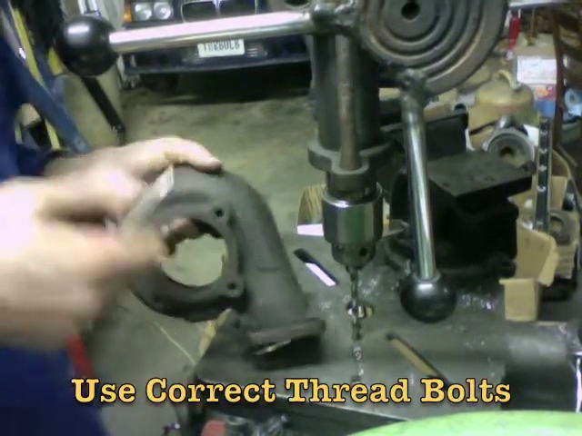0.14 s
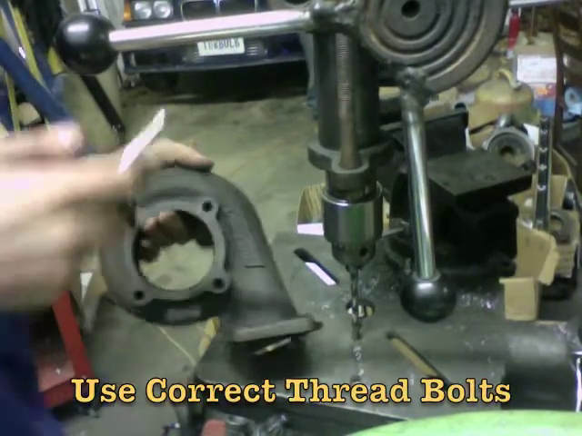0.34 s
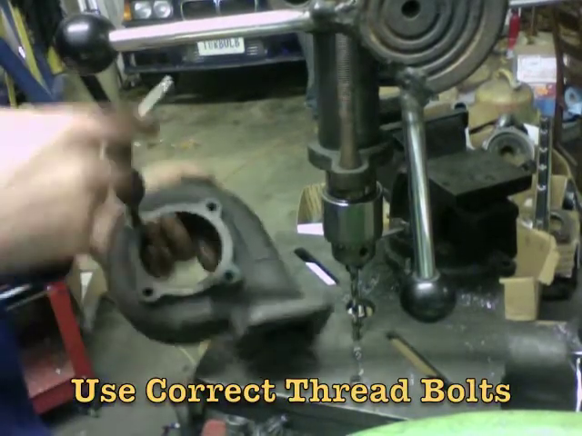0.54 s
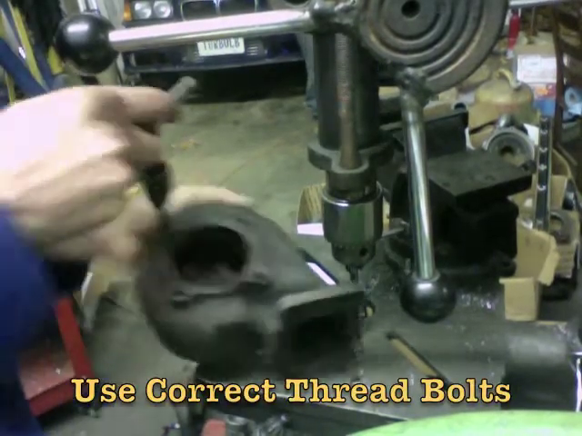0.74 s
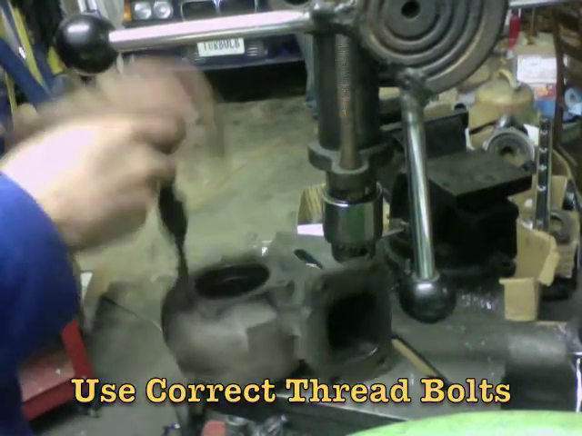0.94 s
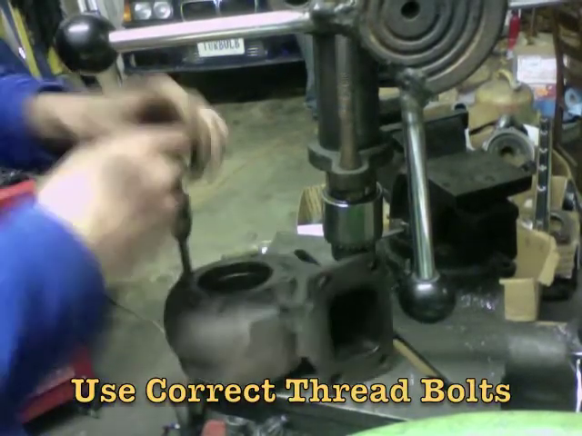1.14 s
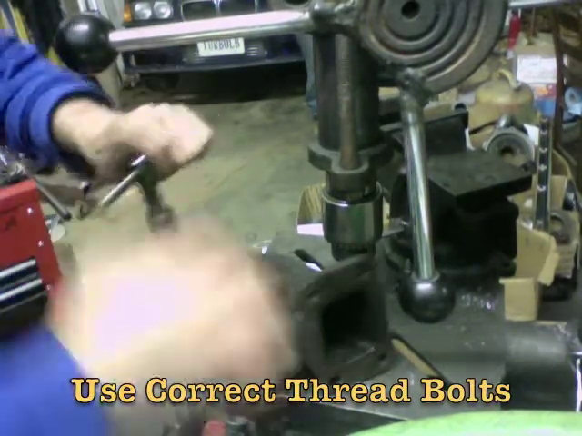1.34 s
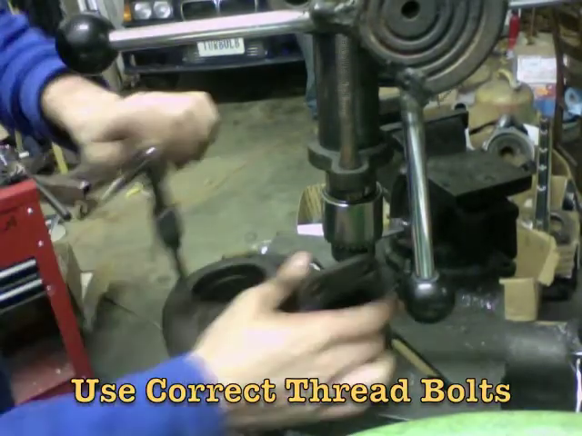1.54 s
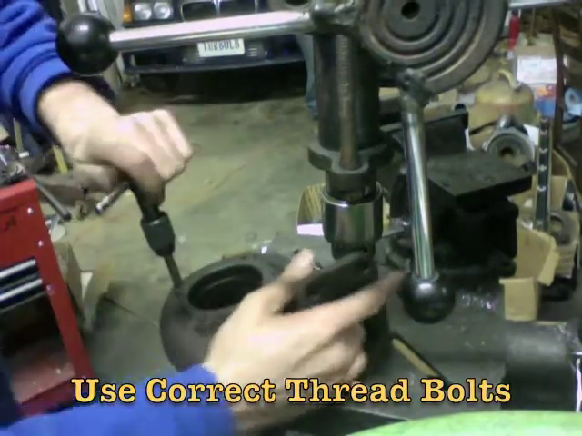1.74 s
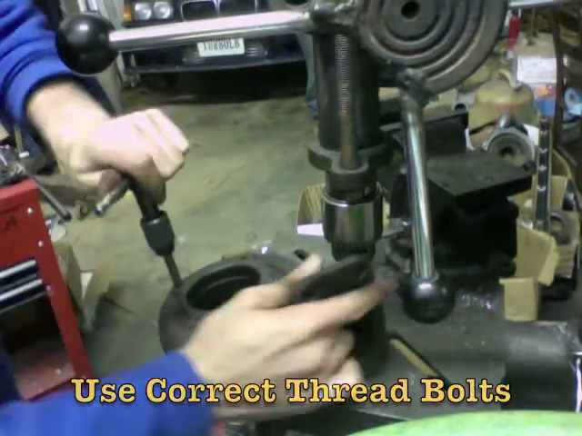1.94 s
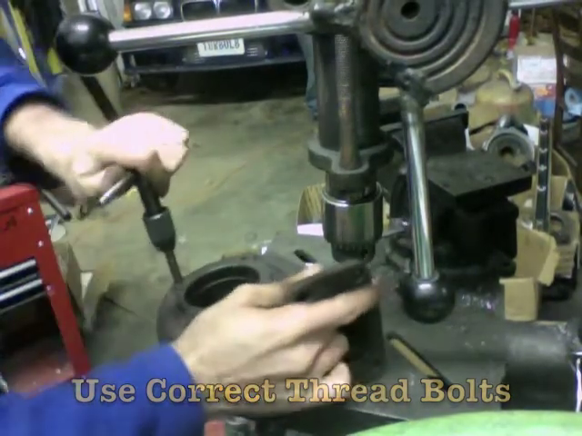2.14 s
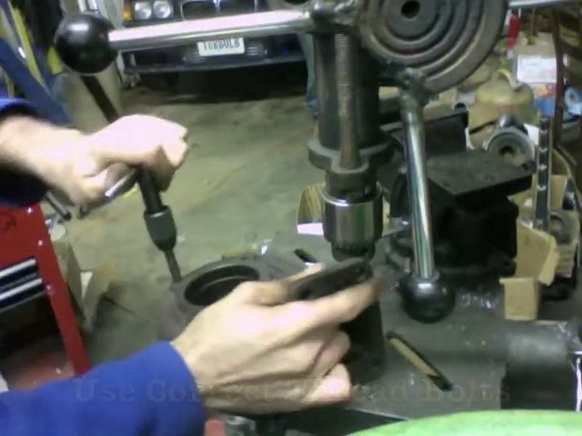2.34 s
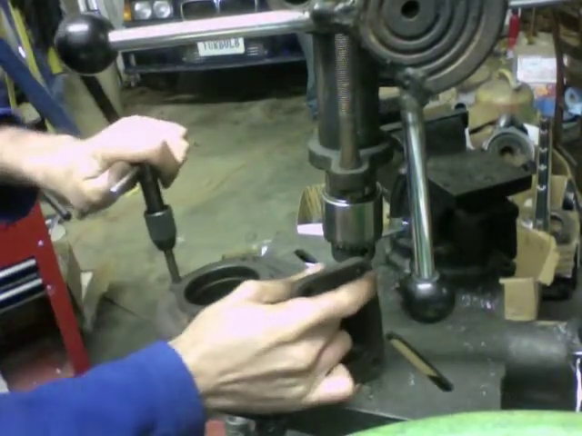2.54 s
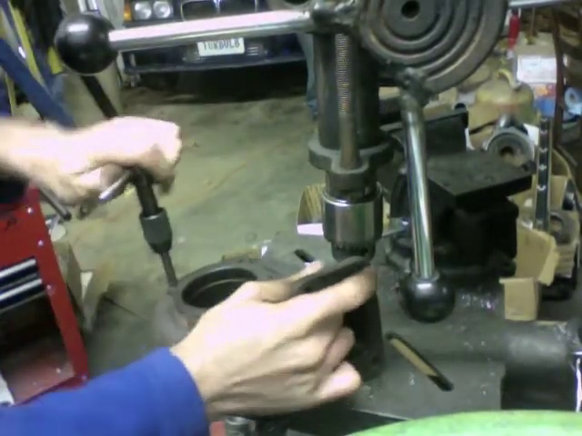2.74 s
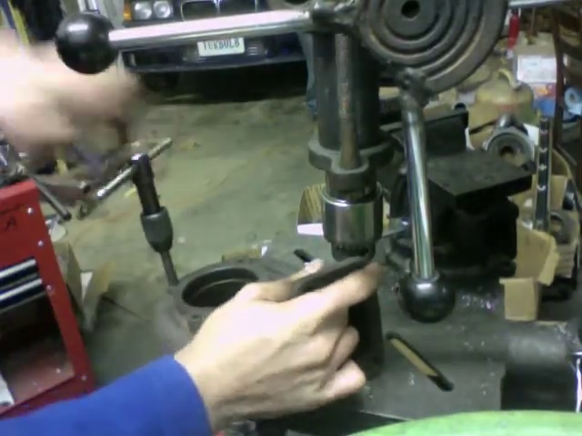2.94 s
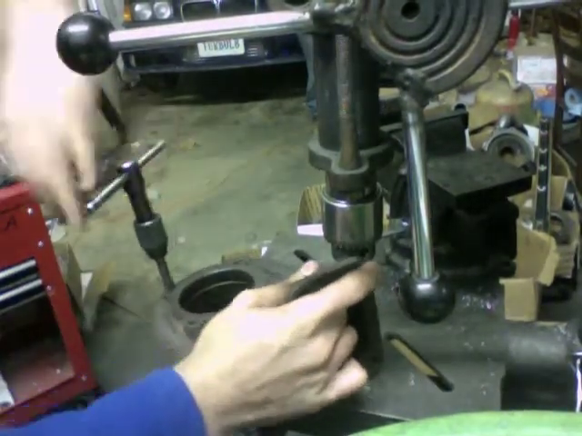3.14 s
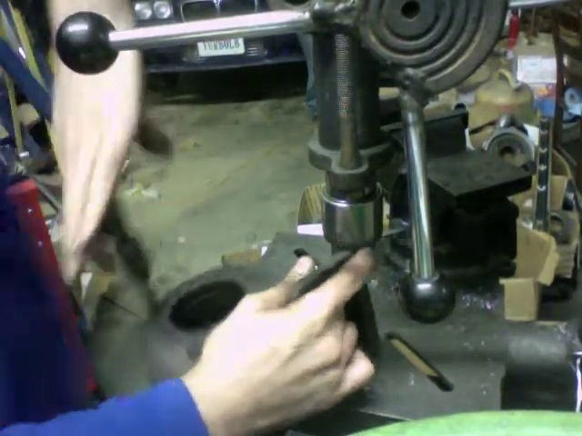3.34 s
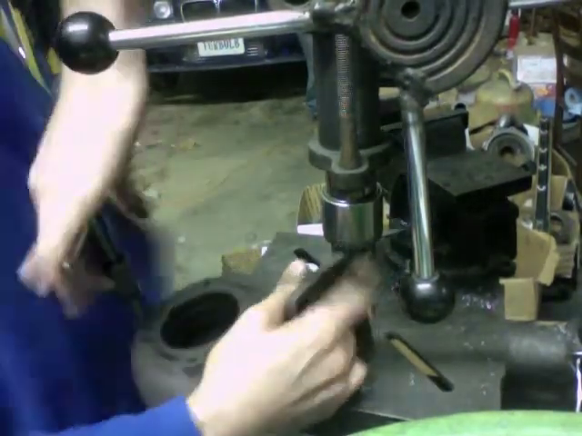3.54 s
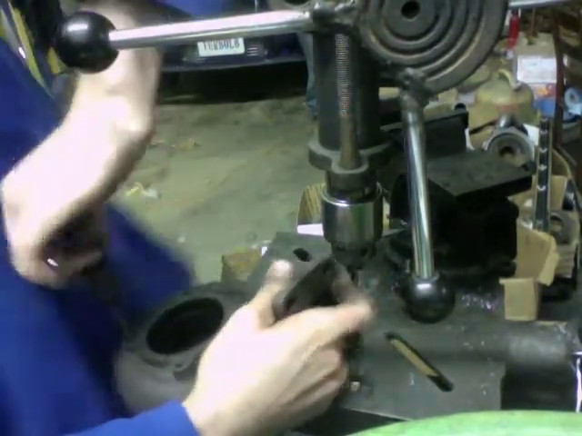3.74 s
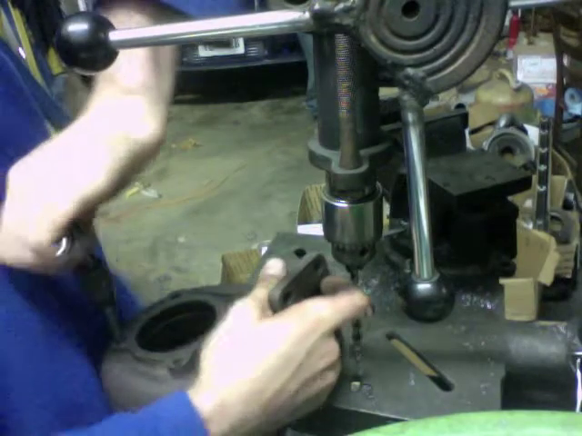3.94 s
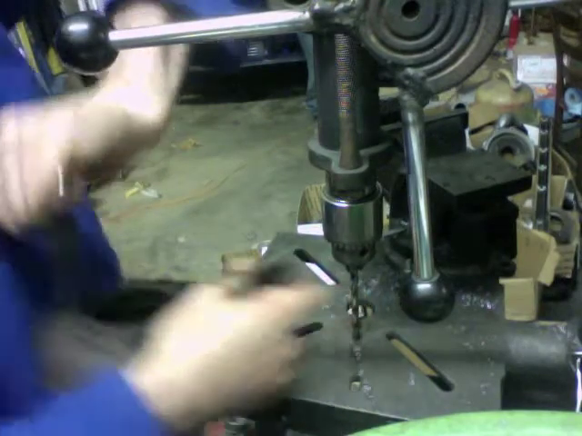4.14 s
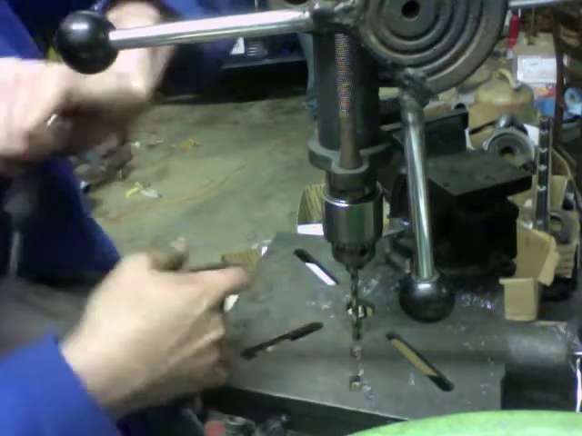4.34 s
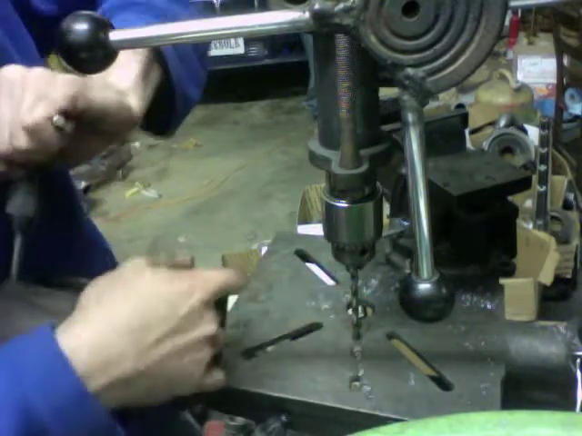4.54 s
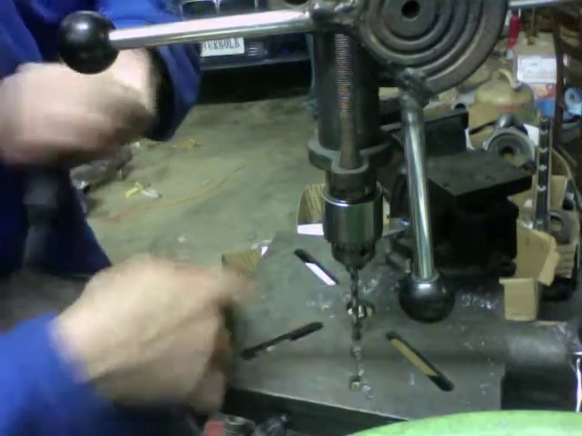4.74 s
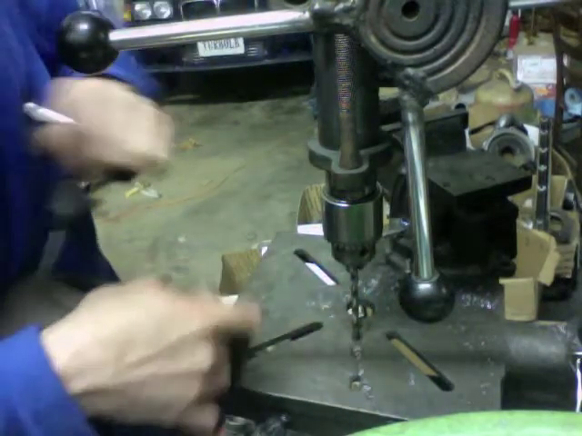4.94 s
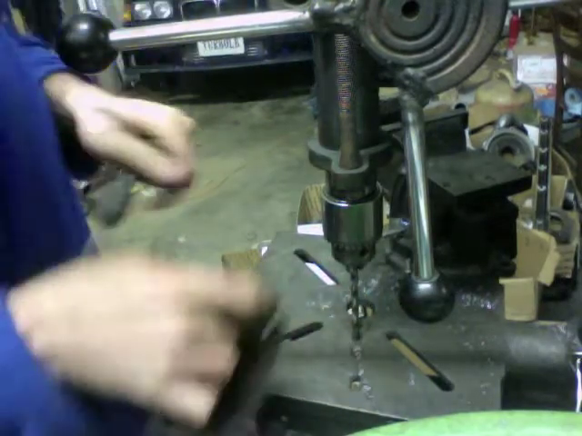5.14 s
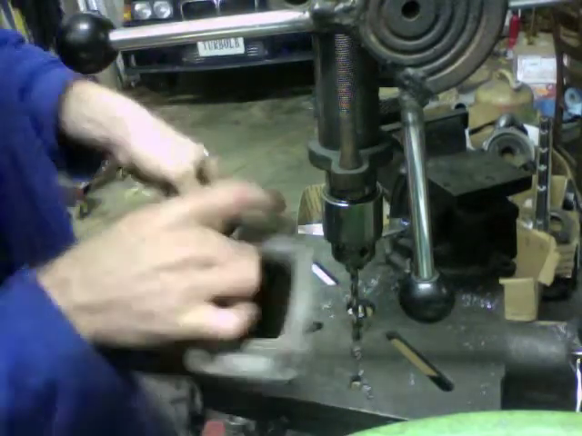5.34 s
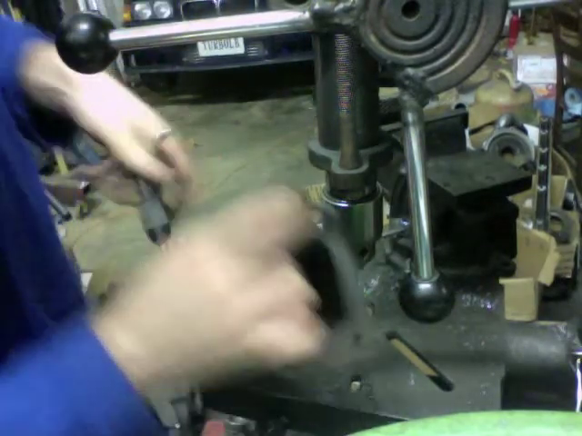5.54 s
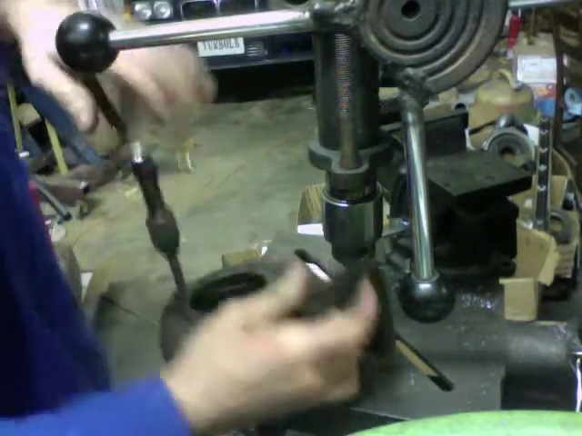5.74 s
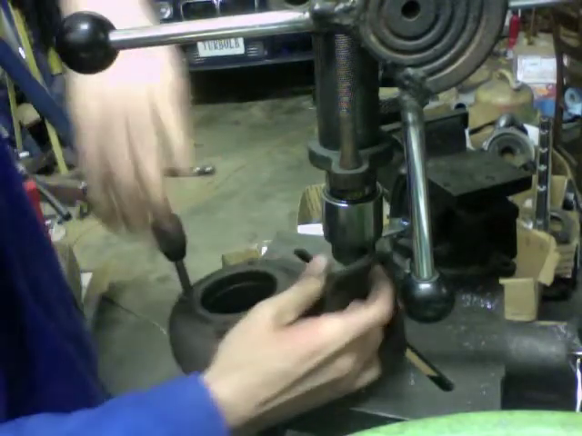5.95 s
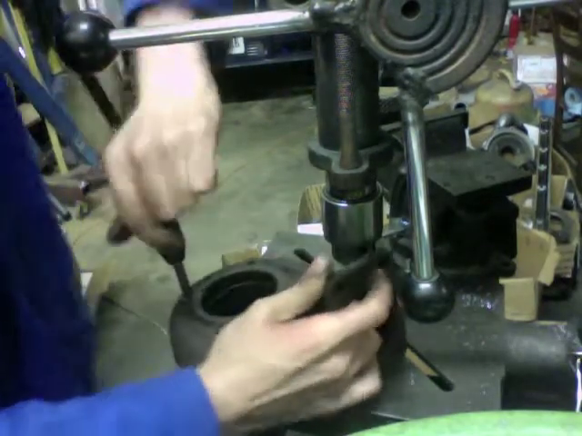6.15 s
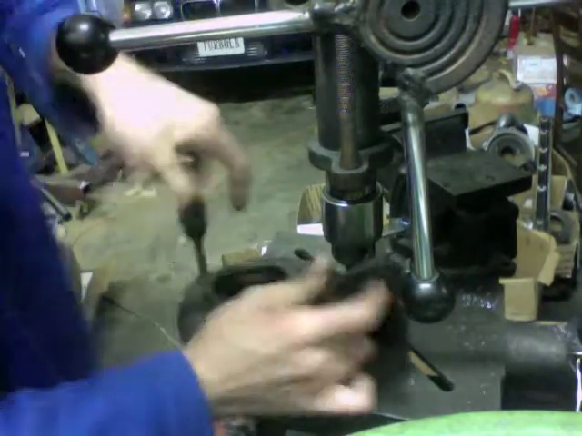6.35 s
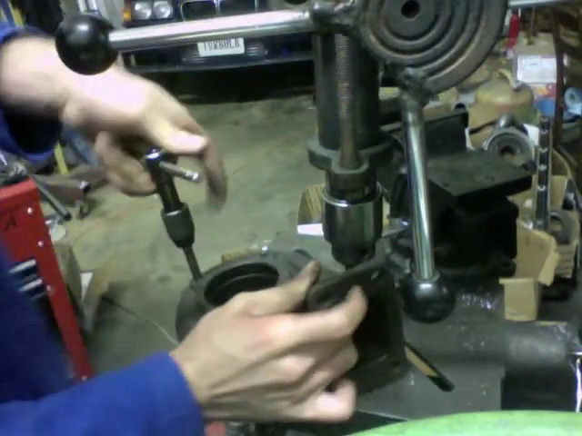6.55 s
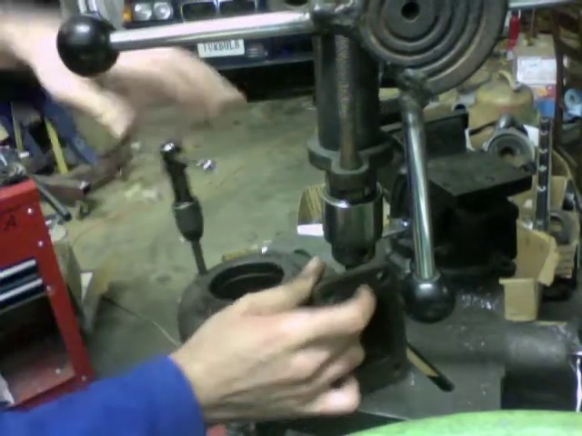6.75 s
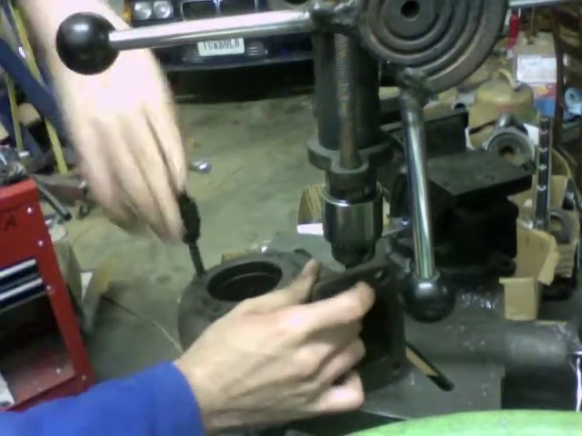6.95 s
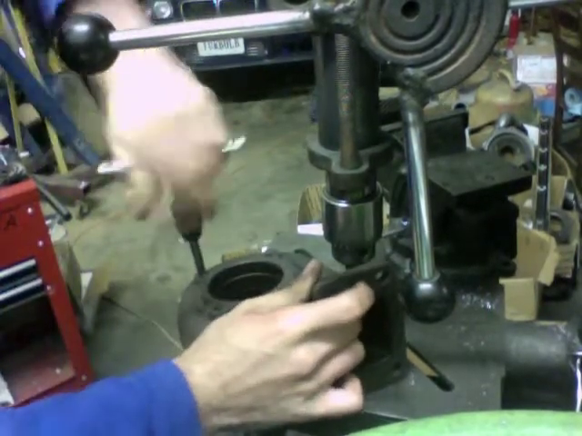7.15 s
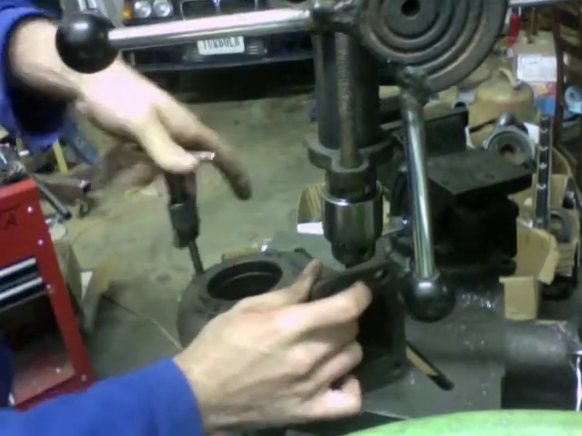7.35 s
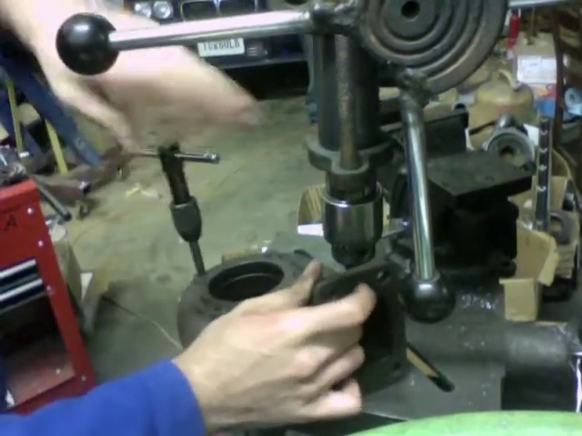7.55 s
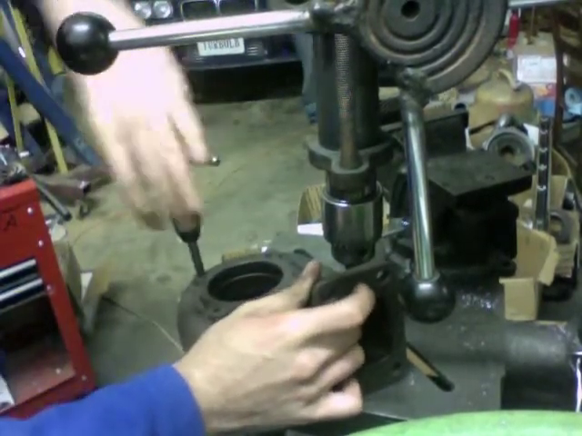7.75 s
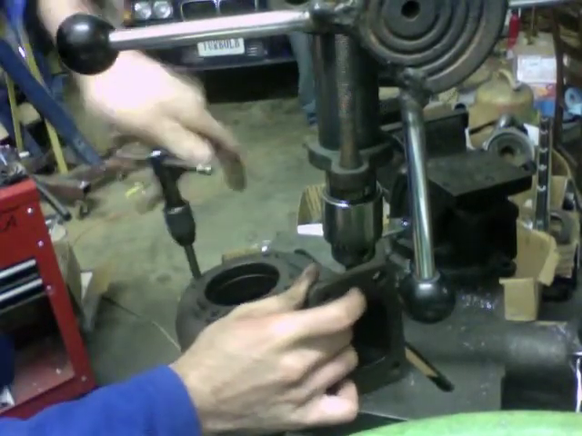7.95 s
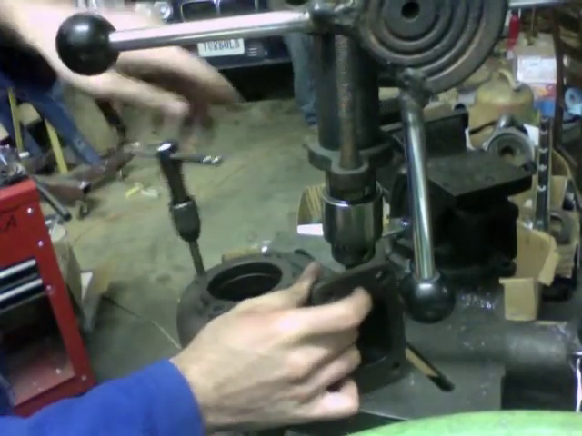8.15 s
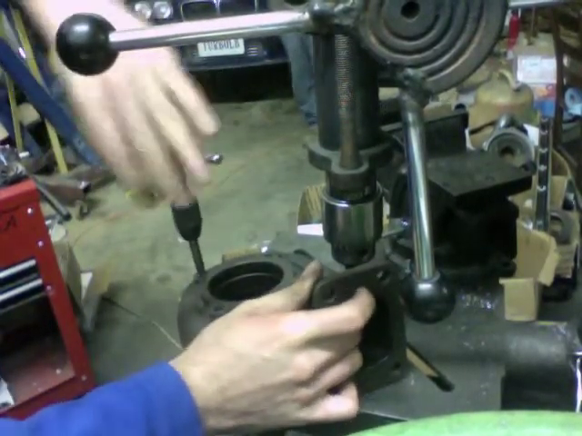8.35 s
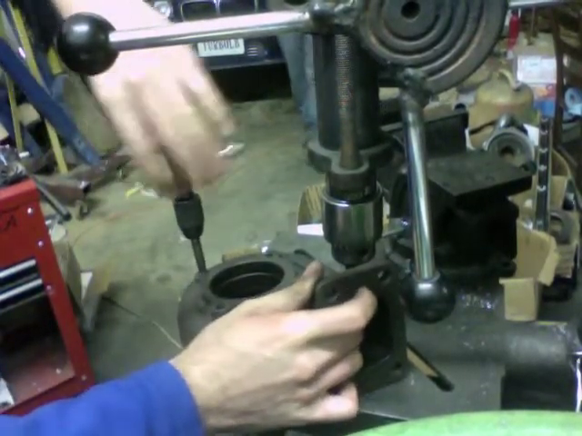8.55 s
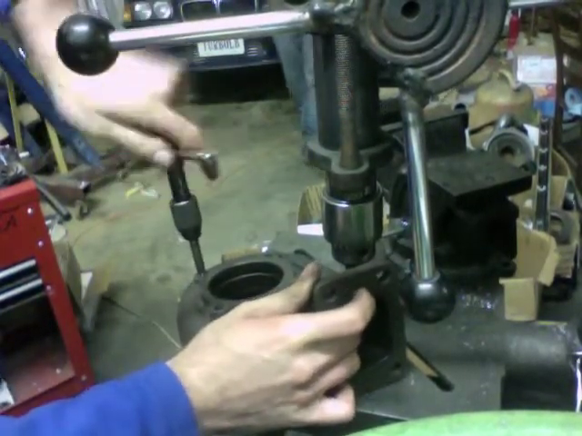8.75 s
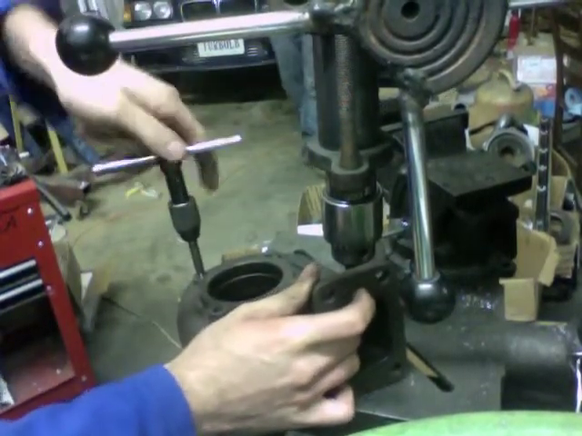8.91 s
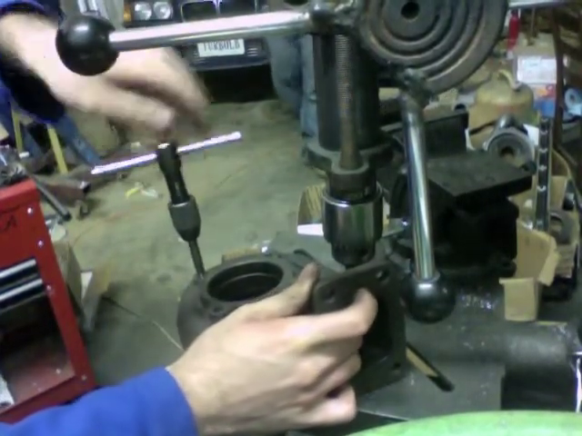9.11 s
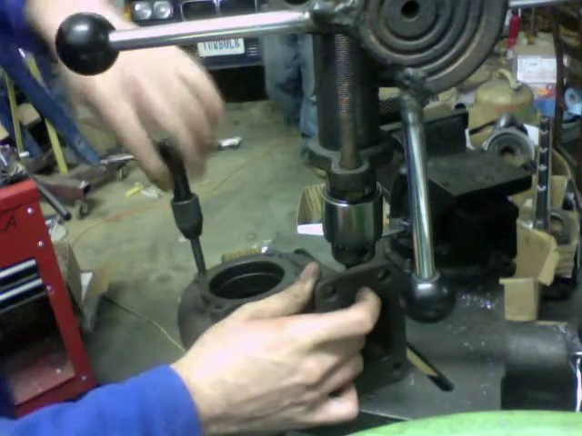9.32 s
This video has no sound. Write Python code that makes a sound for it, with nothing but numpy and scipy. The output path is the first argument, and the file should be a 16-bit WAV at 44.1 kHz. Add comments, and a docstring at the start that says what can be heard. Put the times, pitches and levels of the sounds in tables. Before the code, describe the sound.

A close, thin small-microphone perspective in a workshop, with faint steady hiss and short reverberation. From 0 to 0.9 s a heavy iron housing grinds over a steel table in uneven shoves, ringing and singing at high pitches; sharp knocks fall at 0.3 and, loudest, around 0.9, slightly overloaded. At 1.1-1.6 a tap thuds dully in its hole, followed by faint crunches, thin chirps and sleeve rustle until 2.6. Bright clinks come at 2.8, 3.15 and 3.4, with scraping from 3.1 to 4.2. Two ragged, piercing iron squeals sound at 4.65 and 4.85, the second longer and fading. Hard bangs strike at 5.7 and 6.35, with short deep scrapes and a cloth swish between. After 6.6 only light, bright clinks and ticks of the spun wrench's loose bar remain, irregular, strongest near 7.4, 8.57 and 9.1, with a tiny chirp at 7.1.

```python
"""A cast-iron housing is dragged, turned and set down on the steel table of a drill press in a workshop.
Random catches, moving resonances and ringing modes make it grind and sing; short rattles with dense tails
make it knock, and ragged harmonics make it squeal twice. A tap in its hole thuds, crunches and chirps, the
loose cross bar of its wrench clinks, and a sleeve swishes past as hiss with gliding zips. A faint hiss lies
below; the small microphone overloads on the loudest knocks."""
import sys
import numpy as np
from scipy import signal
from scipy.fft import rfft, irfft, next_fast_len
from scipy.io import wavfile
from scipy.ndimage import uniform_filter1d

SR = 44100
rng = np.random.default_rng(int(sys.argv[2]) if len(sys.argv) > 2 else 0)


def inscribe(sig):
    """Save sig as 16-bit PCM at rate SR to the path in sys.argv[1].

    A 1-D sig is mono; a 2-D sig holds one channel per row.
    Samples are clipped to [-1, 1] before scaling.
    """
    pcm = np.round(np.clip(np.atleast_2d(sig).T, -1, 1) * 32767)
    wavfile.write(sys.argv[1], SR, pcm.astype(np.int16))


N = 413658
TIME = np.arange(N) / SR

# bass, middle and treble: low_hz, high_hz
RANGES_HZ = [(40, 600), (600, 3700), (3700, 17000)]
# third-octave bands
EDGES_HZ = np.geomspace(50, 17000, 26)
CENTRES_HZ = np.sqrt(EDGES_HZ[1:] * EDGES_HZ[:-1])
# modes of the housing on the table: pitch_hz, level_db (relative), t60_s (ringing freely)
IRON_MODES = [(355, -2, .4), (564, -6, .3), (778, -3, .3), (990, -5, .3), (1315, 1, .35), (1528, -4, .3),
              (1866, -4, .4), (2150, 0, .35), (2256, -6, .3), (2430, -1, .45), (2550, -3, .3),
              (2848, 1, .33), (3172, -2, .35), (3495, 0, .35), (3805, -2, .35), (4305, -11, .3),
              (4863, -6, .35), (5425, -8, .3), (5850, -4, .3), (6245, -5, .35), (6545, -3, .35),
              (7180, -10, .3), (7430, -11, .25), (8210, -13, .25), (8370, -14, .25), (8620, -12, .2),
              (9650, -19, .2), (10520, -21, .2), (11250, -24, .15), (11610, -20, .2), (11900, -25, .2),
              (12180, -25, .15), (13420, -30, .2)]
# dying away of table and workshop together: frequency_hz, t60_s
DECAY = [(100, 0.95), (400, 0.45), (1200, 0.61), (3000, 0.56), (6500, 0.44), (10000, 0.4), (15000, 0.2)]


def sliding():
    """Rough iron catches on the steel about 2000 times a second and keeps the housing ringing."""
    # colour of the grinding: frequency_hz, level_db
    slide_colour = [(29, -85), (50, -37.5), (114, -14), (200, -9.5), (362, -5), (480, -14), (711, -14.5),
                    (1050, -14.5), (1330, -9), (1620, -17.5), (2810, -17), (3600, -25.5), (5150, -28.5),
                    (6710, -23.5), (7600, -27.5), (9000, -39), (12000, -41), (16000, -81)]
    # ringing over grinding: bass_db, middle_db, treble_db
    ring_over_grind_db = (-8, -3, 10)
    free_share = .07   # share of its free ring time that each mode keeps while dragged
    wander_db = 8.0

    judder = from_db(0.63 * drift(90))
    force = grit(grains_per_s=2000, grain_db=3.0) * judder
    springy = contact(bounce_width_hz=115, whine_width_hz=110)
    rough = coloured(force, slide_colour) + from_db(-2.0) * springy

    # as the point of contact travels, it favours now one mode, now another; the contact damps them all
    ringing = np.zeros(N)
    for hz, db, t60 in IRON_MODES:
        damped_t60 = free_share * t60
        mode = rms_one(ring(ring(force, hz, damped_t60), hz, damped_t60))
        ringing += from_db(db + wander_db * drift(14)) * mode

    out = np.zeros(N)
    for (low, high), ring_db, gain in zip(RANGES_HZ, ring_over_grind_db, shoves()):
        grinding_part = rms_one(band(rough, low, high, order=4))
        ringing_part = rms_one(band(ringing, low, high, order=4))
        part = grinding_part + from_db(ring_db) * ringing_part
        # even out the level, so that the shoves alone shape it
        running_power = uniform_filter1d(part ** 2, size=3000)
        out += gain * part / np.sqrt(running_power + 1e-9)
    return out


def shoves():
    """Gain of bass, middle and treble: each shove builds up, fades or grows as it goes, and rings out."""
    # shoves of the housing over the table:
    # start_s, length_s, attack_s, bass_db, middle_db, treble_db, fade_db (over the shove; negative grows)
    shove_rows = [(-0.02, 0.29, 0.029, -34, -39.5, -43.5, -1.5),
                  (0.233, 0.073, 0.036, -25.5, -21.5, -25, 10),
                  (0.358, 0.12, 0.078, -21.5, -25.5, -31.5, 5.5),
                  (0.498, 0.22, 0.018, -33.5, -34, -46, -6.5), (0.628, 0.24, 0.025, -24.5, -27, -46.5, 4),
                  (3.14, 0.09, 0.051, -28, -30.5, -44.5, 0), (3.238, 0.067, 0.019, -23.5, -28.5, -42, 3),
                  (3.29, 0.3, 0.023, -26, -35, -49.5, 10.5), (3.56, 0.13, 0.049, -25.5, -33.5, -47.5, 7),
                  (3.711, 0.068, 0.021, -45, -55.5, -70, 4), (3.86, 0.079, 0.021, -36, -44, -54, 1),
                  (3.902, 0.18, 0.1, -29, -27, -34, 0.5), (4.098, 0.084, 0.027, -32.5, -29, -38.5, -2.5),
                  (4.191, 0.027, .02, -36.5, -40, -45, -1), (5.868, 0.078, 0.037, -12, -20, -28, 21.5),
                  (6.18, 0.082, 0.059, -19, -20, -30.5, 4.5), (6.29, 0.11, 0.027, -30, -31.5, -44, -4),
                  (6.445, 0.16, 0.011, -32.5, -32, -42.5, 14)]
    rise_db, ring_out_db_per_s = 23, 185   # climb during the attack; fall once the housing stops

    gains = np.zeros((len(RANGES_HZ), N))
    for s, length, attack, *levels, fade_db in shove_rows:
        near = (TIME > s) & (TIME < s + length + .5)
        t = TIME[near] - s
        below_db = rise_db * np.maximum(1 - t / attack, 0)
        below_db += fade_db * np.minimum(t / length, 1)
        below_db += ring_out_db_per_s * np.maximum(t - length, 0)
        shove = from_db(np.array(levels)[:, None] - below_db)
        gains[:, near] = np.maximum(gains[:, near], shove)
    return gains


def contact(bounce_width_hz, whine_width_hz):
    """Three narrow resonances of the springy contact (bounce, octave, whine) glide with the pressure."""
    # pitch and level, levels against the bounce: time_s, bounce_hz, octave_db, whine_hz, whine_db
    contact_curve = [(0, 349.6, -19, 1341, -4.5), (0.18, 298.3, -22.5, 1214, 1),
                     (0.31, 318.6, -17, 1149, 1), (0.41, 256.1, -15, 1116, -9.5),
                     (0.55, 322.2, -7.5, 1304, -9.5), (0.66, 365, 4.5, 1352, -1.5),
                     (0.85, 368.9, 2, 1330, -10.5), (3.19, 370, -4, 1270, -17.5),
                     (3.26, 408.8, 5, 1250, -4.5), (3.31, 341.5, 0, 1307, -10),
                     (3.4, 300.4, -7, 1204, -7.5), (3.65, 343.2, -0.5, 1200, -2),
                     (3.89, 350, -4, 1294, -11), (4.03, 368, -6.5, 1320, -5), (4.19, 325.7, -9.5, 1233, -4),
                     (6.2, 480, 3, 1293, -9.5), (6.27, 309.1, -3, 1287, -10)]
    bounce_hz, octave_db, whine_hz, whine_db = in_time(contact_curve)
    bounce = gliding_hiss(bounce_hz, bounce_width_hz)
    octave = gliding_hiss(2 * bounce_hz, 2 * bounce_width_hz)
    whine = gliding_hiss(whine_hz, whine_width_hz)
    return bounce + from_db(octave_db) * octave + from_db(whine_db) * whine


def singing():
    """Friction feeds one mode of the dragged housing for a while: it swells, wavers and rings out."""
    # start_s, length_s, pitch_hz, level_db
    sing_rows = [(0.03, .18, 3510, -55.5), (0.03, .19, 5857, -58), (0.03, .14, 4863, -58.5),
                 (0.04, .2, 6535, -55), (0.24, .075, 6546, -47.5), (0.24, .24, 6250, -48.5),
                 (0.255, .065, 3445, -52), (0.34, .06, 4863, -45.5), (0.36, .12, 3160, -49.5),
                 (0.39, .28, 2848, -49.5), (0.6, .23, 4860, -51), (0.62, .2, 5850, -50.5),
                 (0.738, .07, 7430, -55.5), (0.76, .08, 2150, -45.5), (3.94, .19, 6535, -43),
                 (3.95, .13, 2842, -47.5), (3.973, .11, 4863, -54.5), (4.013, .2, 4300, -50),
                 (3.99, .21, 8215, -55), (4.017, .2, 8370, -57.5), (3.966, .28, 9620, -63),
                 (3.57, 0.11, 2160, -52.5), (4.157, .08, 2135, -48), (4.167, .09, 6535, -51),
                 (6.214, .12, 6245, -49.5)]
    wander_hz, waver_db = 24, 5
    attack_s, ring_out_t60_s = .03, .13

    out, t = np.zeros(N + SR), TIME[:SR]
    for s, length, hz, db in sing_rows:
        swell = np.minimum(t / attack_s, 1) * dying(ring_out_t60_s, np.maximum(t - length, 0))
        phase = 2 * np.pi * np.cumsum(hz + wander_hz * drift(90, size=SR)) / SR
        level = from_db(db + waver_db * drift(40, size=SR))
        out[round(s * SR):][:SR] += np.sqrt(2) * level * swell * np.sin(phase)
    return out[:N]


def squeal():
    """Stick-slip starts ragged and locks into cleaner harmonics that glide through the iron's resonances."""
    # pitch of each squeal of iron on steel; it holds on one resonance after another: time_s, pitch_hz
    pitch_curves = [
        [(4.658, 1790), (4.664, 1770), (4.668, 1925), (4.682, 2000), (4.687, 2095), (4.696, 2105),
         (4.701, 2195), (4.708, 2190), (4.713, 2120), (4.733, 2112), (4.738, 1960), (4.748, 1560)],
        [(4.845, 2100), (4.859, 2095), (4.873, 2085), (4.89, 2098), (4.921, 2118), (4.952, 2372), (4.97, 2368),
         (5.005, 2336), (5.06, 2364), (5.085, 2340)],
    ]
    # start_s, length_s, level_db, fade_db_per_s (negative grows), lock_s, roughness once locked (0-1)
    squeal_rows = [(4.656, 0.084, -13.5, -9.5, 0.021, 0.2), (4.851, .222, -16.5, 50, 0.03, 0.19)]
    # how strongly the iron radiates the harmonics: frequency_hz, level_db
    squeal_colour = [(1500, -26.5), (2100, -11), (2370, -13.5), (3500, -1.5), (3950, -12), (4230, -0.5),
                     (4400, -7), (4720, -3), (5900, -2.5), (6350, -3), (6580, 2), (6800, -9), (7080, -6),
                     (7800, -12.5), (8450, -12), (8900, -20), (9440, -14.5), (10600, -14.5), (11800, -6.5),
                     (12700, -16.5), (13300, -16), (14200, -37)]
    attack_s, release_t60_s = 0.0016, 0.024
    jitter, rasp, flutter_db = 0.024, .6, 3.0   # pitch jitter (share) and rasp depth at roughness 1

    hz, = in_time([point for curve in pitch_curves for point in curve])
    level, rough = np.zeros(N), np.zeros(N)
    for s, length, db, fade_db_per_s, lock_s, settled in squeal_rows:
        on = TIME >= s
        t = TIME[on] - s
        held = from_db(db - fade_db_per_s * np.minimum(t, length))
        release = dying(release_t60_s, np.clip(t - length, 0, 10 * release_t60_s))
        level[on] += held * np.minimum(t / attack_s, 1) * release
        rough[on] = settled + np.exp(-np.minimum(t, length) / lock_s)

    phase = 2 * np.pi * np.cumsum(hz * (1 + jitter * rough * drift(1400))) / SR
    tone = np.zeros(N)
    for k in range(1, 8):
        strength = from_db(at_hz(squeal_colour, k * hz) + flutter_db * drift(77))
        tone += strength * (1 + rasp * rough * drift(700)) * np.sin(k * phase)
    return np.sqrt(2) * tone * level


def knocks():
    """The heavy housing strikes the table: a hard rattle, its modes pressed broad, then a ringing tail."""
    # start_s, bass_db, middle_db, treble_db, ring_db (tail over rattle),
    # favoured_hz, favoured_db, second_hz, second_db (favoured resonances)
    knock_rows = [(0.3255, -15, -15, -15.5, -10, 4170, -13, 3000, -7),
                  (0.729, -30.5, -40, -43, -31, 656, 4, 1310, 0),
                  (0.883, -21, -0.5, -1.5, -7, 3450, -9.5, 2810, -5),
                  (0.893, -14, -6, -13, -1, 1300, -5, 2430, 0.5),
                  (0.937, -26, -22, -17, -4, 3800, 2, 2380, -6),
                  (0.971, -32, -20, -23.5, 4, 2365, 4, 4863, -11),
                  (3.146, -48.5, -37, -34, -19.5, 3550, 5.5, 3040, 5),
                  (3.402, -38, -34.5, -36, -26, 3350, 17, 2810, -5),
                  (4.563, -33, -54.5, -70, -3, 355, -7, 574, -8.5),
                  (4.618, -39.5, -55, -66.5, -10.5, 345, -6, 564, -8.5),
                  (4.657, -31.5, -23.5, -14, -24, 2170, -24, 6460, -8),
                  (4.840, -73, -31, -17.5, -30, 2180, 1.5, 6500, -23),
                  (5.695, -11, -2, -13, -14, 2162, -3, 1337, -9.5),
                  (5.7272, -13, -4.5, -11.5, -8.5, 1293, -13, 4865, -14),
                  (5.934, -29, -26, -45, -11, 1325, -20, 2850, -13),
                  (6.344, -11.5, -0.5, -13, -11, 2145, -9.5, 1795, -9.5)]
    # frequency_hz, level_db
    knock_colour = [(35, -61.5), (60, -32), (91, -21), (164, -11), (354, -9), (666, -9.5), (1310, -3),
                    (1660, -8), (2190, -4.5), (3850, -15.5), (5090, -18.5), (6430, -19.5), (9130, -27.5),
                    (12100, -36.5), (16000, -58)]
    return from_db(-2.5) * blows(
        knock_rows, knock_colour, IRON_MODES, modes_db=-2.5, pressed_db=9, pressed_width_hz=55,
        hold_s=0.0048, rattle_t60=0.047, rise_s=0.00083, scatter_db=2.5, chatter_db=1.0,
        patchy_db=0.5, favoured_t60=.04, tail_cut_hz=4800)


def blows(rows, colour, modes, modes_db, pressed_db, pressed_width_hz, hold_s, rattle_t60, rise_s,
          scatter_db, chatter_db, patchy_db, favoured_t60, tail_cut_hz):
    """Each blow is a short rattle of the contact, then a dense tail with the object's own modes in it."""
    out, t = np.zeros(N + SR), TIME[:SR]
    # while the parts press together, the modes show as broad resonances in the rattle
    pressed = [(hz, db + pressed_db) for hz, db, _ in modes]
    dense = noise_bands(colour, size=3 * SR, peaks=pressed, width_hz=pressed_width_hz)
    # the parts chatter unevenly as they settle
    dense = dense * from_db(chatter_db * drift(120)[:3 * SR])
    # the tail dies away band by band and is softened above tail_cut_hz
    fade = dying(at_hz(DECAY, CENTRES_HZ)[:, None], t)
    fade = fade / np.hypot(1, (CENTRES_HZ[:, None] / tail_cut_hz) ** 2)
    hz, mode_db, t60 = np.transpose(modes)
    rings = np.sin(2 * np.pi * hz[:, None] * t) * dying(t60[:, None], t)
    rings = rings / np.hypot(1, (hz[:, None] / tail_cut_hz) ** 2)
    released = np.maximum(t - hold_s, 0)

    for s, bass_db, middle_db, treble_db, ring_db, *favoured in rows:
        start = rng.integers(2 * SR)
        patches = from_db(patchy_db * rng.standard_normal((len(CENTRES_HZ), 1)))
        grain = dense[:, start:start + SR] * patches
        # every blow lands on another spot and stirs another mix of modes
        strengths = from_db(mode_db + scatter_db * rng.standard_normal(len(hz)))
        strengths = strengths * rng.choice([-1, 1], len(hz))
        mode_tail = strengths @ rings / np.linalg.norm(strengths)
        tail = np.sum(grain * fade, axis=0) + from_db(modes_db) * mode_tail
        blow = grain.sum(axis=0) * dying(rattle_t60, released) + from_db(ring_db) * tail
        # the spot may favour a resonance or two, which stand out of the rattle and ring on
        for spot_hz, spot_db in zip(favoured[::2], favoured[1::2]):
            swing = dying(favoured_t60, released)
            swing = swing + .5 * from_db(ring_db) * dying(at_hz(DECAY, spot_hz), t)
            blow = blow + np.sqrt(2) * from_db(spot_db) * swing * np.sin(2 * np.pi * spot_hz * t)
        blow = blow * (1 - np.exp(-(t / rise_s) ** 2))
        # weight and hardness of the contact set the height of bass, middle and treble
        for (low, high), level_db in zip(RANGES_HZ, (bass_db, middle_db, treble_db)):
            part = band(blow, low, high, order=5)
            height = np.sqrt(uniform_filter1d(part ** 2, size=176).max())
            out[round(s * SR):][:SR] += from_db(level_db) * part / height
    return out[:N]


def thuds():
    """The tap knocks dully into its hole: slower blows with a soft tail and little treble."""
    # start_s, bass_db, middle_db, treble_db, ring_db (tail over rattle)
    thud_rows = [(1.10, -31, -42.5, -68, -11.5), (1.189, -32, -27.5, -64, -22),
                 (1.234, -29.5, -33, -74, -18), (1.275, -47, -61.5, -69, -21),
                 (1.514, -29.5, -21.5, -46.5, -27), (1.558, -33, -38.5, -57, -12.5),
                 (1.592, -41.5, -45, -60, -19)]
    # frequency_hz, level_db
    thud_colour = [(60, -24), (130, -13), (330, -5), (600, -12), (740, -3.5), (870, 4), (1100, -23),
                   (1330, -9.5), (1550, -17.5), (1750, -15.5), (2100, -25.5), (2520, -17.5), (3100, -32),
                   (4700, -24), (8000, -42.5), (16000, -66)]
    return from_db(-1.0) * blows(
        thud_rows, thud_colour, IRON_MODES, modes_db=-11.0, pressed_db=-18.0, pressed_width_hz=93,
        hold_s=0.00086, rattle_t60=0.076, rise_s=0.0022, scatter_db=2, chatter_db=3.0,
        patchy_db=2, favoured_t60=.04, tail_cut_hz=1700)


def clinks():
    """The wrench's loose cross bar strikes: light, short rattles with strong modes in a bright tail."""
    # start_s, bass_db, middle_db, treble_db, ring_db (tail over rattle), favoured_hz, favoured_db
    clink_rows = [(1.126, -57.5, -52, -41.5, -19, 6545, 15), (1.611, -55, -42.5, -43.5, -23, 2544, -18),
                  (1.657, -55, -67, -58, -32, 6620, 1), (1.755, -79.5, -75, -45, -42, 8620, 6),
                  (2.769, -60.5, -39.5, -29.5, -18.5, 6700, -9), (2.79, -54, -37.5, -35.5, -24, 4130, -0.5),
                  (3.146, -57.5, -34, -21, -28, 4160, 0.5), (3.402, -37, -39, -22, -24, 6400, -2),
                  (3.426, -55.5, -37.5, -44.5, -28, 3630, -1), (5.07, -69, -55.5, -56, -13, 6620, -6),
                  (5.797, -61.5, -42.5, -30.5, -18, 8180, -8.5), (6.093, -55.5, -60, -37.5, -39, 5560, 3),
                  (6.588, -53, -32, -37, -17, 6380, -12), (6.596, -65, -40.5, -23, -26.5, 6730, -12.5),
                  (6.688, -67, -42, -43.5, -28, 6545, -4), (7.039, -71.5, -63, -60, -25, 6550, -5),
                  (7.383, -65.5, -54.5, -50, -23.5, 6010, -3), (7.401, -49, -28.5, -25, -22.5, 4270, -4.5),
                  (7.412, -48.5, -36.5, -33.5, -29.5, 7690, 4), (7.782, -73, -52.5, -46.5, -5.5, 6500, 14),
                  (7.857, -71, -53.5, -59.5, -25, 11700, -2.5), (7.997, -49, -48.5, -76, -1, 1472, -1),
                  (8.033, -58.5, -49, -50, -20, 1795, -2.5), (8.05, -57, -42.5, -44, -25.5, 6480, -6.5),
                  (8.263, -71, -46, -31.5, -26, 6420, -4), (8.351, -63, -52.5, -66.5, -29.5, 1460, -4.5),
                  (8.566, -37, -38, -21, -23.5, 6200, -8), (8.609, -46.5, -64, -42, -19, 4750, -1),
                  (8.659, -54, -51.5, -51, -32, 1850, -2), (8.777, -62, -51.5, -50, -29.5, 940, -4),
                  (8.877, -74.5, -41.5, -34.5, -25.5, 6370, -8.5),
                  (9.066, -51.5, -41, -42.5, -18.5, 824, 3), (9.082, -57.5, -33.5, -22, -25, 6546, 0.5),
                  (9.123, -51, -36, -40, -18, 897, 0), (9.175, -57, -45.5, -57, -27, 936, -2),
                  (9.233, -68, -45.5, -37, -25, 6490, 4), (9.268, -58.5, -43, -37.5, -20, 4930, -6)]
    # frequency_hz, level_db
    clink_colour = [(100, -14), (300, 3.5), (550, -7), (850, -15), (1150, -14), (1550, -6), (2300, -12),
                    (3600, -8), (4400, 0), (5300, -0.5), (5950, 3.5), (6550, 1), (8100, 0.5), (9100, -11),
                    (10900, -13.5), (12150, 0.5), (13300, -19), (15500, -23)]
    # pitch_hz, level_db (relative), t60_s
    wrench_modes = [(765, 4, .2), (830, 15, .06), (940, 15, .06), (1320, 2, .2), (1455, 8, .14),
                    (1850, 7, .07), (4225, -1, .3), (4400, 2, .05), (5030, -4, .25), (5320, -3, .3),
                    (6480, -1, .28), (6620, 3, .06), (7322, -1, .28), (7690, -3, .28), (8212, -4, .26),
                    (11980, -5, .22), (12200, -2, .06)]
    return from_db(-2.5) * blows(
        clink_rows + ticks(count=9), clink_colour, wrench_modes, modes_db=15.0, pressed_db=7.0,
        pressed_width_hz=93, hold_s=.001, rattle_t60=0.026, rise_s=.0018, scatter_db=4.0,
        chatter_db=2.5, patchy_db=3.5, favoured_t60=.03, tail_cut_hz=16000)


def ticks(count):
    """While the wrench is spun, its loose bar ticks faintly at random: rows like those of the clinks."""
    # typical tick: bass_db, middle_db, treble_db, ring_db
    tick_levels = (-70, -59.5, -99, -20.5)
    spin_from_s, spin_to_s, scatter_db = 7.5, 9.3, 5
    rows = []
    for _ in range(count):
        s = spin_from_s + (spin_to_s - spin_from_s) * rng.random()
        rows.append((s, *(tick_levels + scatter_db * rng.standard_normal(4))))
    return rows


def cutting():
    """Each push of the tap breaks a run of tiny chips out of the thread, heard as a crunch."""
    # start_s, length_s, level_db
    cut_rows = [(1.855, 0.088, -43), (2.115, 0.099, -60), (2.275, 0.091, -65), (2.462, 0.082, -55.5),
                (2.512, 0.048, -53)]
    # frequency_hz, level_db
    cut_colour = [(100, -3), (300, -5), (550, -0.5), (830, 10), (1100, -9), (1450, 3), (2000, -13),
                  (2600, 1.5), (3400, -22.5), (5000, -28), (5900, -16), (7500, -36), (14000, -47)]
    level = np.zeros(N)
    for s, length, db in cut_rows:
        progress = np.clip((TIME - s) / length, 0, 1)
        level += from_db(db) * np.sqrt(np.abs(np.sin(np.pi * progress)))
    chips = grit(grains_per_s=500, grain_db=3.0)
    return level * coloured(chips, cut_colour)


def chirps():
    """The turning tap chirps in its thread: thin sines that glide and waver in pitch."""
    # start_s, length_s, start_hz, end_hz, level_db
    chirp_rows = [(1.733, .21, 14100, 15400, -82), (7.109, 0.025, 11800, 12150, -34.5),
                  (7.137, 0.076, 11770, 11240, -65), (7.753, 0.064, 10440, 11700, -62),
                  (9.292, 0.098, 10630, 11200, -69)]
    out, waver = np.zeros(N), 1 + 0.011 * drift(710)
    for s, length, start_hz, end_hz, db in chirp_rows:
        on = (TIME >= s) & (TIME < s + length)
        progress = (TIME[on] - s) / length
        hz = (start_hz + (end_hz - start_hz) * progress) * waver[on]
        whistle = np.sin(2 * np.pi * np.cumsum(hz) / SR)
        out[on] += np.sqrt(2) * from_db(db) * np.sin(np.pi * progress) * whistle
    return out


def sleeve():
    """Cloth hisses as the arm swings by; its weave adds zips, noise in a resonance that glides."""
    # start_s, length_s, level_db, zip_start_hz, zip_end_hz, zip_db (over the hiss)
    swish_rows = [(1.578, 0.53, -59.5, 2540, 2650, -1), (1.926, 0.12, -64.5, 9440, 5600, 11),
                  (1.92, 0.11, -63.5, 4920, 3760, 11), (1.921, 0.3, -60.5, 2695, 1240, 2.5),
                  (5.922, 0.16, -49.5, 4550, 4400, 0.5), (5.918, .28, -50, 2690, 2530, -2.5),
                  (7.528, 0.31, -60, 1810, 2800, -5.5), (8.07, 0.24, -59, 2500, 2294, -18)]
    # frequency_hz, level_db
    sleeve_colour = [(120, -44), (200, -16), (383, -19), (1130, -24), (1460, -13), (3470, -13), (5260, -24),
                     (7830, -24.5), (15000, -49)]
    glide_bend, zip_width_share, flutter_db = 1.5, .15, 2   # width as a share of the zip's first pitch

    out = np.zeros(N)
    cloth = coloured(grit(grains_per_s=7500, grain_db=-0.5), sleeve_colour)
    for s, length, db, start_hz, end_hz, zip_db in swish_rows:
        progress = np.clip((TIME - s) / length, 0, 1)
        zip_hz = start_hz + (end_hz - start_hz) * progress ** glide_bend
        zipping = gliding_hiss(zip_hz, width_hz=zip_width_share * start_hz)
        swing = np.cbrt(4 * progress * (1 - progress))
        out += from_db(db) * swing * (cloth + from_db(zip_db) * zipping)
    return out * from_db(flutter_db * drift(60))


def background_hiss():
    """A faint steady hiss: noise of a fixed colour."""
    # frequency_hz, level_db
    floor_colour = [(50, -15), (110, -5.5), (250, -5.5), (550, -12.5), (850, -13.5), (1500, -17.5),
                    (2600, -17.5), (3400, -9.5), (4100, -2), (4600, -19.5), (6000, -21.5), (8000, -26),
                    (11000, -35.5), (16000, -43.5)]
    return from_db(-64.5) * coloured(rng.standard_normal(N), floor_colour)


def workshop(x, wet_db):
    """Add the diffuse echo of the room: noise that dies away at its own speed in each band."""
    # frequency_hz, level_db
    echo_colour = [(500, 0), (4000, 0), (14000, -0.69)]
    fade = dying(at_hz(DECAY, CENTRES_HZ)[:, None], TIME[:SR])
    tail = np.sum(noise_bands(echo_colour, SR) * fade, axis=0)
    return x + from_db(wet_db) * signal.fftconvolve(x, tail / np.linalg.norm(tail))[:N]


def grit(grains_per_s, grain_db):
    """Random tiny catches of uneven size and either sign."""
    caught = rng.random(N) < grains_per_s / SR
    size_db = grain_db * np.minimum(rng.exponential(1, N), 4)
    return caught * rng.choice([-1, 1], N) * from_db(size_db)


def ring(force, hz, t60):
    """A mode: a unit push sets a sine ringing that starts at height 1 and dies away."""
    r, w = dying(t60, 1 / SR), 2 * np.pi * hz / SR
    return signal.lfilter([0, np.sin(w)], [1, -2 * r * np.cos(w), r * r], force)


def gliding_hiss(hz, width_hz):
    """Noise in one moving resonance; unit power."""
    phase = 2 * np.pi * np.cumsum(hz) / SR
    return rms_one(drift(width_hz) * np.cos(phase) + drift(width_hz) * np.sin(phase))


def noise_bands(colour, size, peaks=(), width_hz=60):
    """Noise of the given colour, lifted at resonances (Hz, dB), split into third-octave bands."""
    hz = np.fft.rfftfreq(size, 1 / SR)
    lift_power = 1
    for centre, db in peaks:
        lift_power = lift_power + from_db(db) ** 2 / (1 + (2 * (hz - centre) / width_hz) ** 2)
    spectrum = rfft(coloured(rng.standard_normal(size), colour)) * np.sqrt(lift_power)
    spectrum = rfft(rms_one(irfft(spectrum, size)))
    # neighbouring bands cross-fade, so that they sum to the whole
    shares = [np.interp(hz, CENTRES_HZ, one_band) for one_band in np.eye(len(CENTRES_HZ))]
    return np.array([irfft(spectrum * share, size) for share in shares])


def coloured(x, colour):
    """Give a sound a spectrum; unit power."""
    size = next_fast_len(len(x))
    gain = from_db(at_hz(colour, np.fft.rfftfreq(size, 1 / SR)))
    return rms_one(irfft(rfft(x, size) * gain, size)[:len(x)])


def drift(rate, size=N):
    """A random curve: straight lines between knots of spread 1, `rate` knots a second."""
    knots = rng.standard_normal(size // 8)
    return np.interp(TIME[:size] * rate, np.arange(len(knots)), knots)


def dying(t60, t):
    """Amplitude that falls 60 dB in t60."""
    return np.exp(-np.log(1000) * t / np.maximum(t60, 1e-3))


def band(x, low, high, order):
    """Band-pass."""
    return signal.sosfilt(signal.butter(order, [low, high], "band", fs=SR, output="sos"), x)


def in_time(rows):
    """The columns of a curve at every sample."""
    s, *columns = np.transpose(rows)
    return [np.interp(TIME, s, c) for c in columns]


def at_hz(points, hz):
    """Read a table along log frequency."""
    f, value = np.transpose(points)
    return np.interp(np.log(np.maximum(hz, 1)), np.log(f), value)


def from_db(db):
    """Decibels to gain."""
    return 10 ** (np.asarray(db) / 20)


def rms_one(x):
    """Scale to unit power."""
    return x / np.sqrt(np.mean(x ** 2) + 1e-20)


def scene():
    """Housing, tap wrench and sleeve over a faint hiss."""
    housing = from_db(-9.0) * sliding() + knocks()
    housing += workshop(singing(), wet_db=-17.5)
    housing += workshop(squeal(), wet_db=-15.0)
    wrench = thuds() + clinks()
    wrench += workshop(cutting(), wet_db=-15.5)
    wrench += workshop(chirps(), wet_db=-11.5)
    return (housing + wrench + sleeve() + background_hiss())[None]


def record(dry):
    """The loudest knocks overload the small microphone; deep bass and the top are cut."""
    top = .98
    overloaded = top * np.tanh(dry / top)
    thin = signal.sosfilt(signal.butter(5, 88, "high", fs=SR, output="sos"), overloaded)
    return signal.sosfilt(signal.ellip(10, .1, 80, 16200, fs=SR, output="sos"), thin)


dry = scene()
out = record(dry)
inscribe(out)
```